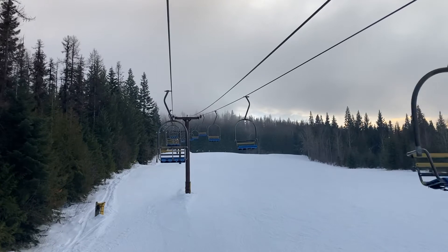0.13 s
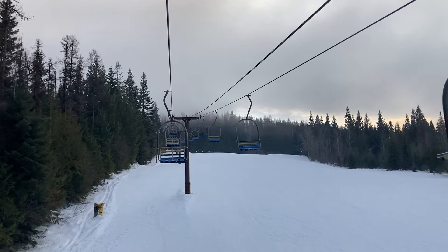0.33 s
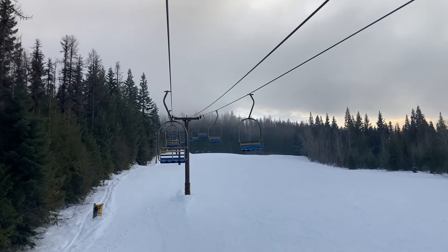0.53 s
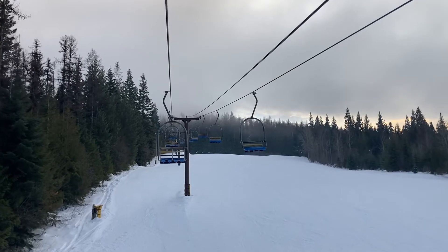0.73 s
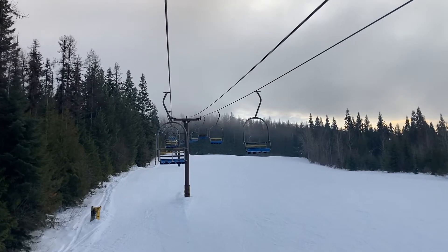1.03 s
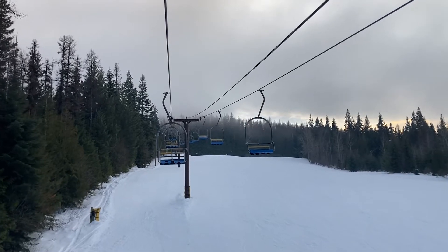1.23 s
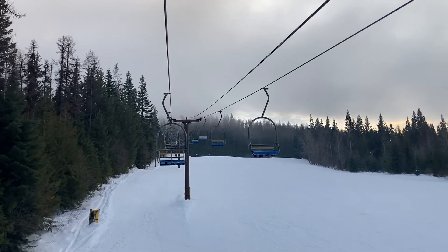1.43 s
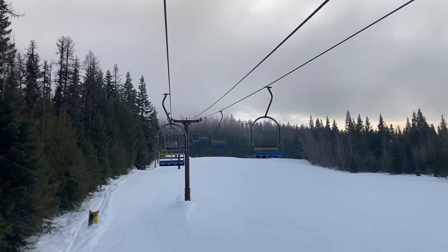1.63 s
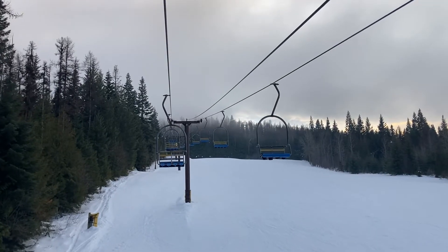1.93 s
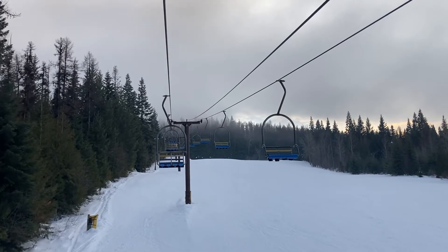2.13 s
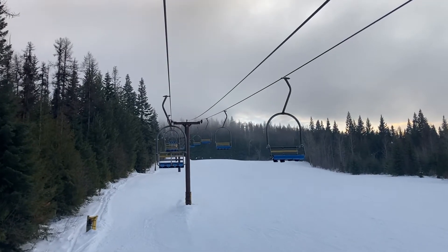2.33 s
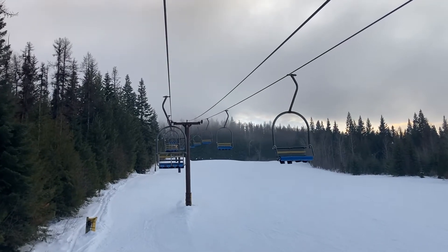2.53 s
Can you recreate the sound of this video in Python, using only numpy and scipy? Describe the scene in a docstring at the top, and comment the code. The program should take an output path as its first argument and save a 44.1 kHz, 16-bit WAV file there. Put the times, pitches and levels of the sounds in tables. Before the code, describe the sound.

Loose chairlift seat clattering and clinking irregularly, its steel frame ringing, with wind buffeting the microphone

```python
"""An empty chair rattles past on the right of a moving chairlift and falls behind.
Its loose slats and fittings knock (noise bursts with short ringing tones) and scrape (grainy noise).
The harder knocks set the steel frame ringing: close, beating sine tones that slowly sink in pitch.
Wind buffets two microphone ports as low noise and short thumps, over the noisy rumble of the ride."""
import sys
import numpy as np
from scipy import signal
from scipy.fft import rfft, irfft
from scipy.io import wavfile
from scipy.ndimage import uniform_filter1d, map_coordinates

SR = 44100
rng = np.random.default_rng(int(sys.argv[2]) if len(sys.argv) > 2 else 0)


def wrap_up_sound(samples):
    """Save the sound to the file named by the first command line argument, as 16-bit audio."""
    columns = np.atleast_2d(samples).T
    # keep every value between -1 and 1, then stretch to whole-number steps
    tamed = np.clip(columns, -1, 1)
    steps = np.round(tamed * 32767).astype(np.int16)
    wavfile.write(sys.argv[1], SR, steps)


N = 119070
T = np.arange(N) / SR  # time in seconds
ATTACK_S = 0.0008  # time constant of the onset of cracks, clinks and ringing


def undb(db):
    """Turn decibels into a gain."""
    return 10 ** (np.asarray(db) / 20)


def curve(rows, t):
    """Join (seconds, value) points by straight lines."""
    return np.interp(t, *np.array(rows, float).T)


def response(rows, hz):
    """Read gains off (Hz, dB) points, joined by straight lines over log frequency."""
    f, db = np.array(rows, float).T
    return undb(np.interp(np.log(hz + 1), np.log(f), db))


def unit(x):
    """Scale a sound to an rms of 1."""
    return x / np.sqrt(np.mean(x ** 2))


def noise(rows):
    """Shape white noise to a spectrum of (Hz, dB) points, with an rms of 1."""
    hz = np.arange(N // 2 + 1) * SR / N
    white = rng.standard_normal(N)
    return unit(irfft(rfft(white) * response(rows, hz), N))


def even(x, size):
    """Steady the level of a noise by dividing by its running power, smoothed twice over size samples."""
    power = uniform_filter1d(uniform_filter1d(x ** 2, size), size)
    return x / np.sqrt(power + 1e-12)


def colour(x, rows, size=512):
    """Filter a sound through (Hz, dB) points without any sound before its start."""
    hz = np.arange(size // 2 + 1) * SR / size
    # folding the cepstrum forward in time gives a minimum-phase filter
    cepstrum = irfft(np.log(response(rows, hz)))
    cepstrum[1:size // 2] *= 2
    cepstrum[size // 2 + 1:] = 0
    impulse = irfft(np.exp(rfft(cepstrum)))
    return signal.fftconvolve(x, impulse)[:len(x)]


def fade(t, t60):
    """Die away exponentially, by 60 dB in t60 seconds."""
    return np.exp(-np.log(1000) * t / np.maximum(t60, 1e-3))


def onset(t, attack_s):
    """Rise quickly from silence towards 1."""
    return 1 - np.exp(-t / attack_s)


def panned(x, db):
    """Share a sound between two ports; db is left minus right."""
    return x * undb(np.array([db, -db]).reshape(2, -1) / 2)


def add(out, x, s):
    """Mix a sound in, starting at s seconds."""
    i = max(int(s * SR), 0)
    out[..., i:i + x.shape[-1]] += x[..., :max(N - i, 0)]


def knocks(size=24000):
    """Each knock is a crack, a rattle, ringing fittings and the clink of the struck part, with a faint echo."""
    # Each row: start in seconds, relative levels in dB at 1.3-2.2, 2.2-3.1, 3.1-4.2 and above 4.2 kHz,
    # rattle and crack decay in seconds per 60 dB, clink pitch in Hz, clink level in dB, left minus right in dB.
    knock_rows = [(0.018, -48.5, -60.5, -46, -69, 0.17, 0.017, 1630, -59.5, 1),
                  (0.0885, -55, -61, -50.5, -71, 0.06, 0.021, 2160, -54, 2),
                  (0.139, -51, -55.5, -57, -77.5, 0.09, 0.011, 1600, -62, 0),
                  (0.1713, -48, -59.5, -42.5, -67.5, 0.06, 0.03, 2020, -45, -1),
                  (0.2778, -64.5, -52.5, -55, -68.5, 0.14, 0.036, 2020, -53, 3),
                  (0.327, -56, -51.5, -60, -69.5, 0.11, 0.013, 2126, -46, 2),
                  (0.3883, -68, -67.5, -80, -100, 0.08, 0.0084, 2320, -66, 6.5),
                  (0.5212, -61, -60, -53.5, -79.5, 0.11, 0.014, 1820, -55, 1),
                  (0.6095, -57.5, -50.5, -56, -60, 0.13, 0.009, 4650, -56, 6),
                  (0.6132, -55, -56, -59, -69, 0.056, 0.009, 2840, -48, 1),
                  (0.6256, -61, -48.5, -43, -59.5, 0.045, 0.0066, 1745, -42, -1),
                  (0.633, -59, -56, -47, -68, 0.029, 0.0079, 3854, -56, -2),
                  (0.7997, -51, -52.5, -62, -61.5, 0.19, 0.015, 4410, -60, -1.5),
                  (0.8165, -54, -43.5, -43.5, -51.5, 0.048, 0.014, 2440, -40, 0.5),
                  (0.9985, -53.5, -64.5, -52, -70.5, 0.099, 0.023, 3457, -43.5, -8.5),
                  (1.0935, -50, -55.5, -47.5, -53, 0.084, 0.0053, 3100, -44, -7),
                  (1.1945, -63, -67, -63.5, -85, 0.12, 0.031, 2070, -59, -9),
                  (1.3338, -83, -78, -95, -95, 0.048, 0.017, 2417, -66, -6),
                  (1.362, -81, -72.5, -81, -90, 0.15, 0.018, 2730, -75, -8),
                  (1.3966, -74, -80, -75, -93, 0.33, 0.0098, 2500, -80, -11),
                  (1.4324, -78, -77, -68.5, -89.5, 0.65, .02, 2460, -68, -7),
                  (1.5181, -61.5, -79, -56.5, -88, 0.47, 0.019, 2500, -73, -5),
                  (1.5487, -59.5, -61.5, -53, -76, 0.31, 0.035, 2250, -68, -8.5),
                  (1.5956, -58.5, -62.5, -50.5, -75.5, 0.082, 0.023, 1720, -76, -5),
                  (1.7506, -51.5, -60, -60, -67.5, 0.074, 0.022, 2270, -67, -1),
                  (1.8546, -57, -65.5, -56, -80, 0.24, 0.017, 1810, -72, 0.5),
                  (1.8802, -52.5, -76, -70, -82, 0.13, 0.017, 2020, -59, -1),
                  (1.9069, -56.5, -65, -63, -73, 0.059, 0.017, 2194, -55, 0),
                  (1.939, -57, -68, -85, -87, 0.07, 0.016, 1830, -61, -0.5),
                  (2.111, -59, -58.5, -56, -73.5, .085, 0.02, 2310, -46.5, -2.5),
                  (2.152, -57, -80, -58, -86, 0.052, .016, 2450, -54.5, -1.5),
                  (2.177, -51.5, -58, -60, -71.5, 0.061, 0.0082, 1790, -70, -3.5),
                  (2.2016, -51, -59, -51.5, -72.5, 0.071, 0.014, 2050, -78, -3),
                  (2.31, -56.5, -55, -57, -73, 0.12, 0.024, 2400, -67, -2),
                  (2.3811, -52, -51.5, -67, -81, 0.038, 0.01, 2210, -64, -1),
                  (2.4021, -49, -44, -61, -80.5, 0.031, 0.0023, 2860, -53, -2.5),
                  (2.5101, -62, -49.5, -58, -75, 0.073, 0.0035, 2523, -43.5, -1.5)]
    # Bass of a knock. Each row: frequency in Hz, level in dB against the lowest band.
    bass_rows = [(300, -15), (800, -28.5), (1150, -13)]
    # Treble of a knock. Each row: frequency in Hz, level in dB against the highest band.
    treble_rows = [(4700, 2), (5500, -3.5), (7400, -3), (9000, -24), (10300, -12.5), (12300, -17),
                   (14000, -47)]
    # Centres of the three lower bands, in Hz.
    band_hz = [1665, 2700, 3370]
    # Spectrum of the knocks scattered back by the trees. Each row: frequency in Hz, relative level in dB.
    echo_rows = [(300, 3.5), (750, 1.5), (1300, 1), (2000, 3), (3000, -7.5), (4500, -9), (6000, -13.5),
                 (9000, -57.5), (11000, -14), (14000, -41)]
    crack_share = 1.8  # against the rattle, before both are levelled
    rattle_top_hz, rattle_attack_s = 7560, 0.0016  # the rattle is duller than the crack
    knock_db, clink_t60_s = 8.5, 0.048
    echo_db, echo_t60_s = -19.5, 0.22
    echo_width = 0.94  # noise of each port's own, against the noise they share

    out, t = np.zeros((2, N)), np.arange(size) / SR
    rise = onset(t, ATTACK_S)
    rattle_filter = signal.butter(2, rattle_top_hz, fs=SR)
    for s, low_db, mid_db, high_db, treble_db, t60, crack_t60, clink_hz, clink_db, pan_db in knock_rows:
        body = [(hz, low_db + db) for hz, db in bass_rows]
        body += list(zip(band_hz, (low_db, mid_db, high_db)))
        body += [(hz, treble_db + db) for hz, db in treble_rows]

        grain, scatter, *own = rng.standard_normal((4, size))
        rattle = signal.lfilter(*rattle_filter, rng.standard_normal(size))
        rattle = unit(onset(t, rattle_attack_s) * rattle * contacts(size) * fade(t, t60))
        crack = unit(rise * even(grain, size=32) * fade(t, crack_t60))
        blow = rattle + crack_share * crack
        blow = blow / np.sqrt(np.mean(blow[t < 0.015] ** 2))  # level the first 15 ms
        direct = colour(blow + rise * fittings(t, t60), body)

        clink = undb(clink_db) * rise * np.sin(2 * np.pi * clink_hz * t) * fade(t, clink_t60_s)
        strength = np.linalg.norm(undb([low_db, mid_db, high_db]))
        echo_fade = fade(t, echo_t60_s)
        echo = np.array([colour((scatter + echo_width * port) * echo_fade, echo_rows) for port in own])
        body_sound = direct + strength * undb(echo_db) * echo
        add(out, panned(clink + undb(knock_db) * body_sound, pan_db), s)
    return out


def contacts(size):
    """Quick contacts of uneven strength make the level of a rattle jump about."""
    grain_db, contact_s = 3.5, 0.0015
    hold = int(contact_s * SR)
    strengths = undb(grain_db * rng.standard_normal(size // hold + 1))
    return uniform_filter1d(np.repeat(strengths, hold)[:size], size=16)  # soften the steps


def fittings(t, knock_t60):
    """Loose fittings ring in short tones, struck and tuned differently each time and damped like the knock."""
    # Each row: pitch in Hz, relative level in dB, decay time as a multiple of the knock's rattle decay.
    mode_rows = [(1757, 1, 1.8), (2070, 7, 1.8), (2130, 0.5, 1.52), (2260, 7.5, 0.61), (2470, 3.5, 1.5),
                 (2680, 3, 1.1), (2925, -18, 0.68), (3720, 5, 0.94), (4012, -1, 2.5), (4440, -6, 2.4),
                 (4564, 3.5, 1.16), (4640, 12, 0.93), (6330, -2, 4.2), (7300, -6.5, 1)]
    level_db, scatter_db = -16, 2.5
    detune_share, max_t60_s = 0.025, 0.14
    hz, db, length = np.array(mode_rows, float).T[:, :, None]
    strength, phase, detune = rng.standard_normal((3, len(mode_rows), 1))
    gain = undb(db + level_db + scatter_db * strength)
    wave = np.sin(2 * np.pi * (hz * (1 + detune_share * detune) * t + phase))
    t60 = np.clip(length * knock_t60, 0.01, max_t60_s)
    return np.sum(gain * wave * fade(t, t60), axis=0)


def frame():
    """The steel frame rings in close, beating modes that buzz, waver and sink; each ring favours some of them."""
    # Ringing of the frame; the first row is already sounding at the start.
    # Each row: start in seconds, relative level in dB, most strongly excited pitch in Hz.
    ring_rows = [(0, -57, 3500), (0.173, -57, 3640), (0.326, -61, 3560), (.522, -65, 3435),
                 (0.625, -56, 3580), (0.816, -57, 3416), (1.001, -55, 3500), (1.092, -57, 3452),
                 (1.547, -55.5, 3433), (1.754, -61, 3390), (1.907, -64.5, 3300)]
    # Modes of the frame. Each row: pitch in Hz before it sinks, relative level in dB, decay in seconds per 60 dB.
    mode_rows = [(3380, 0, .65), (3446, -1.5, .45), (3492, -4, .4), (3549, 0, .32), (3640, -2, .33)]
    # Where the ringing is heard. Each row: time in seconds, left minus right in dB.
    pan_rows = [(0, 4.5), (.75, -1.5), (.9, -6.5), (1.1, -10.5), (1.65, -5), (1.8, -0.5), (2.7, -2)]
    focus_hz, floor = 70, 0.19  # how closely a ring picks its modes; least share of any mode
    sag_per_s, waver_share, buzz_share = 0.007, 0.0015, 0.22

    out = np.zeros(N)
    waver = noise([(1, 0), (12, 0), (40, -40), (200, -120)])
    # a clock that slows down and wavers bends every pitch alike
    clock = np.cumsum(1 - sag_per_s * T + waver_share * waver) / SR
    for s, db, centre_hz in ring_rows:
        since = clock[max(int(s * SR), 0):]
        t = T[:len(since)]
        for (hz, mode_db, t60), turn in zip(mode_rows, rng.random(len(mode_rows))):
            share = floor + (1 - floor) * np.exp(-((hz - centre_hz) / focus_hz) ** 2)
            tone = np.sin(2 * np.pi * (hz * since + turn))
            add(out, share * undb(db + mode_db) * tone * fade(t, t60) * onset(t, ATTACK_S), s)
    buzz = 1 + buzz_share * noise([(1, 0), (90, 0), (400, -30), (3000, -120)])
    return panned(out * buzz, curve(pan_rows, T))


def scrapes():
    """Slats slide and catch: a grainy rasp of noise that swells and dies away."""
    # Scrapes under the knocks. Each row: start in seconds, length in seconds, level in dB, left minus right in dB.
    scrape_rows = [(1.345, 0.11, -81, 0), (1.508, 0.093, -65.5, -5.5), (1.845, 0.113, -61.5, -7)]
    # Spectrum of a scrape. Each row: frequency in Hz, relative level in dB.
    rasp_rows = [(400, -13), (1200, 7.5), (1900, 1), (2600, -1), (3600, -11), (5200, -7), (7500, -21.5),
                 (9000, -38)]
    grain_db = 5.5  # typical swing of the grain
    out = np.zeros((2, N))
    grip = undb(grain_db * noise([(1, 0), (150, 0), (600, -40), (3000, -120)]))
    rasp = unit(noise(rasp_rows) * grip)
    for s, length, db, pan_db in scrape_rows:
        swell = np.sqrt(np.abs(np.sin(np.pi * np.clip((T - s) / length, 0, 1))))
        out += panned(undb(db) * swell * rasp, pan_db)
    return out


def wind():
    """Air buffets both ports together, with single thumps, while cross wind pushes them against each other."""
    # Wind pressure common to both ports. Each row: time in seconds, level in dB.
    gust_rows = [(0, -54.5), (.17, -57), (.33, -52.5), (.45, -51.5), (.55, -50), (.62, -47), (.68, -41),
                 (.76, -44.5), (.86, -41), (.935, -37), (.97, -70), (1.03, -64.5), (1.15, -54),
                 (1.25, -59.5), (1.68, -59.5), (1.74, -51), (1.85, -58.5), (2.02, -48), (2.08, -57.5),
                 (2.18, -45), (2.24, -53.5), (2.7, -59)]
    # Cross wind, opposite at the two ports. Each row: time in seconds, level in dB.
    cross_rows = [(0, -70.5), (.7, -49.5), (1.0, -68), (1.69, -69), (1.73, -47), (1.85, -55), (2.01, -44),
                  (2.08, -53), (2.18, -39.5), (2.24, -51), (2.58, -52), (2.7, -57)]
    # Spectrum of the common buffeting. Each row: frequency in Hz, relative level in dB.
    buffet_rows = [(15, -13.5), (28, -23.5), (40, -7.5), (54, -0.5), (66, 1), (82, -8), (115, -12),
                   (170, -21.5), (260, -40.5), (600, -81.5)]
    # Spectrum of the cross wind. Each row: frequency in Hz, relative level in dB.
    cross_buffet_rows = [(15, -40), (28, -30.5), (42, 0.5), (58, -1), (72, -5.5), (90, -5), (125, -13),
                         (180, -40), (600, -77)]
    # Single thumps of air. Each row: centre in seconds, level in dB, pitch in Hz, half length in seconds.
    thump_rows = [(0.248, -42.5, 81, .009), (.337, -42.5, 65.4, 0.018), (.499, -36, 78, 0.0055),
                  (.579, -33.5, 67, 0.016), (.7, -29, 73.4, 0.0095), (.87, -33, 66.8, 0.016),
                  (.928, -31, 66, .015)]
    common = even(noise(buffet_rows), size=1500) * undb(curve(gust_rows, T))
    across = even(noise(cross_buffet_rows), size=1500) * undb(curve(cross_rows, T))
    for (s, db, hz, half_s), turn in zip(thump_rows, rng.random(len(thump_rows))):
        swell = np.exp(-((T - s) / half_s) ** 2)
        common = common + undb(db) * swell * np.sin(2 * np.pi * (hz * (T - s) + turn))
    return np.array([common + across, common - across])


def ride():
    """Rope and seat rumble as noise, each band flickering on its own, under a wide hiss of air."""
    # Spectrum of the rumble and the open air. Each row: frequency in Hz, relative level in dB.
    spectrum_rows = [(40, -17), (100, -4.5), (190, 2.5), (245, -3), (305, 1.5), (370, -8), (500, -12),
                     (800, -18), (1300, -20), (2500, -27), (3500, -32.5), (5000, -42), (8000, -47),
                     (12500, -47.5), (14000, -66.5)]
    # Stereo width. Each row: frequency in Hz, side against mid in dB.
    side_rows = [(100, -15), (320, -8), (650, 1.5), (3000, -1)]
    # Loudness of the ride. Each row: time in seconds, relative level in dB.
    level_rows = [(0, -59), (.8, -66), (1.15, -64.5), (1.6, -63), (2.4, -62.5), (2.7, -64.5)]
    flicker_db = 2.3  # typical swing of a band
    hz = np.arange(N // 2 + 1) * SR / N
    mid = rfft(noise(spectrum_rows))
    side = rfft(noise(spectrum_rows)) * response(side_rows, hz)
    ports = np.array([mid + side, mid - side])
    out = irfft(ports, N)
    for centre in 160 * 2 ** (np.arange(13) / 3):  # a third of an octave apart, from 160 Hz
        weight = np.maximum(1 - 3 * abs(np.log2((hz + 1) / centre)), 0)
        band = irfft(ports * weight, N)
        flicker = noise([(1, 0), (10, 0), (40, -40), (200, -120)])
        out = out + band * (undb(flicker_db * flicker) - 1)
    return out * undb(curve(level_rows, T))


def scene():
    """The passing chair reaches the right port first; wind and rumble lie under it."""
    # Bearing of the chair. Each row: time in seconds, delay of the left port in milliseconds.
    lag_rows = [(0, 0.13), (.6, 0.22), (1.0, 0.3), (1.55, 0.39), (1.8, 0.4), (2.7, 0.42)]
    left, right = knocks() + frame() + scrapes()
    heard_s = T - curve(lag_rows, T) / 1000
    left = map_coordinates(left, [heard_s * SR])
    return np.array([left, right]) + wind() + ride()


def record(dry):
    """The recorder cuts the top with a steep low-pass filter."""
    top_hz = 14000
    low_pass = signal.ellip(8, 0.2, 70, top_hz, fs=SR, output="sos")
    return signal.sosfilt(low_pass, dry)


dry = scene()
out = record(dry)
wrap_up_sound(out)
```